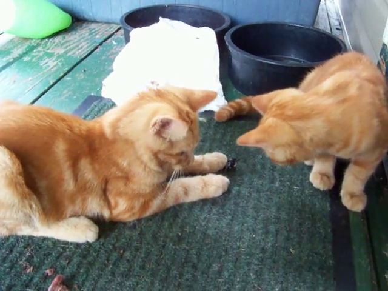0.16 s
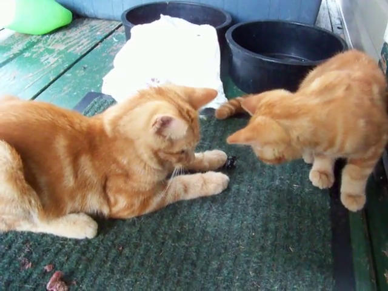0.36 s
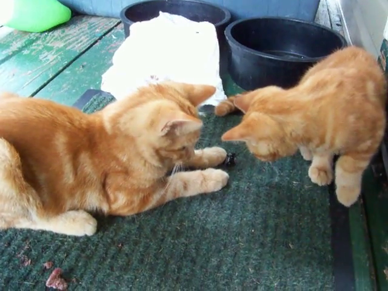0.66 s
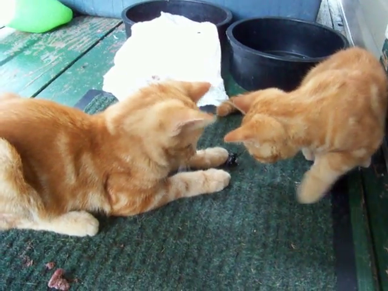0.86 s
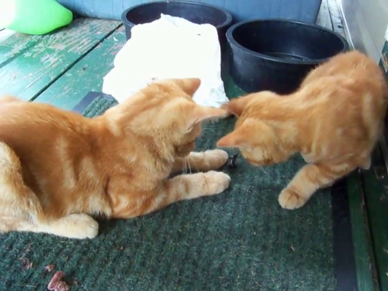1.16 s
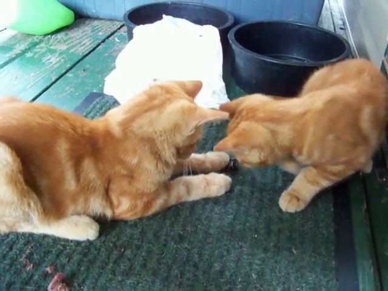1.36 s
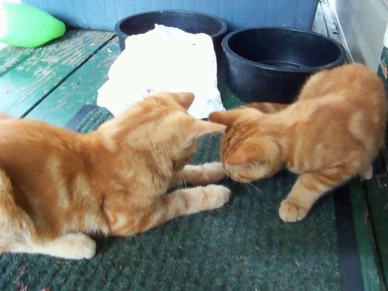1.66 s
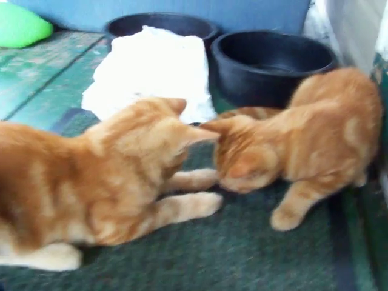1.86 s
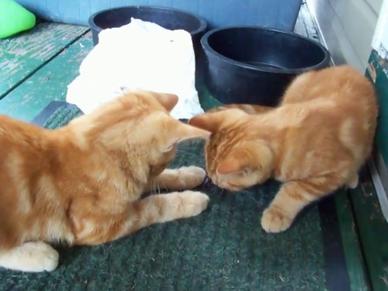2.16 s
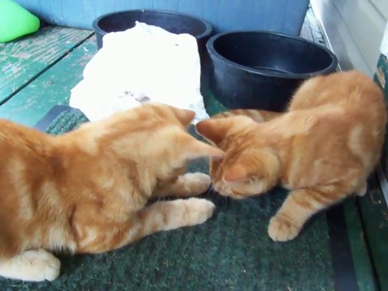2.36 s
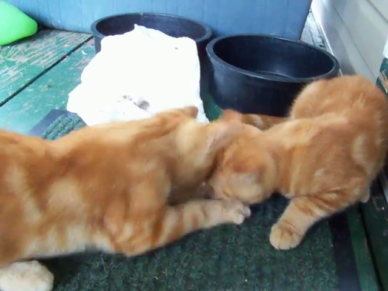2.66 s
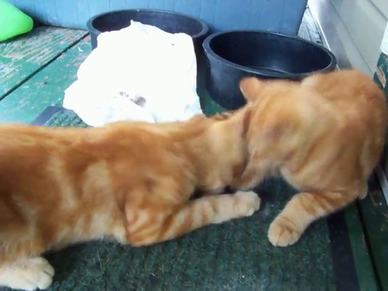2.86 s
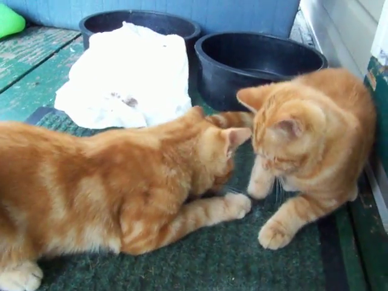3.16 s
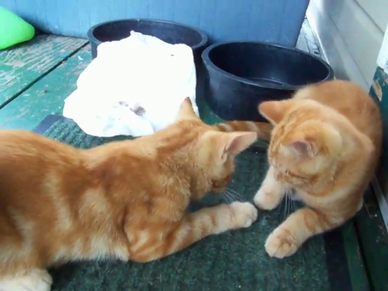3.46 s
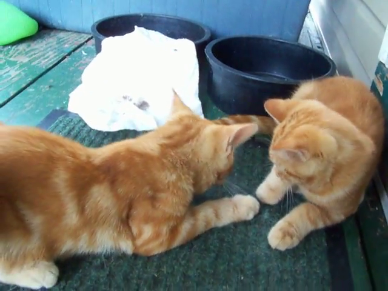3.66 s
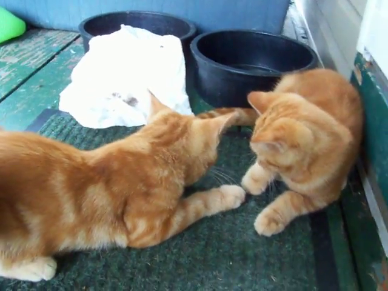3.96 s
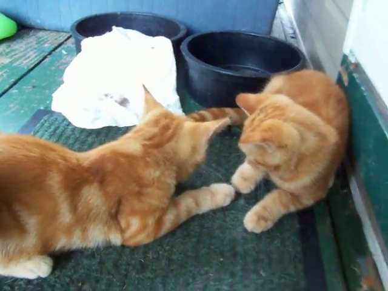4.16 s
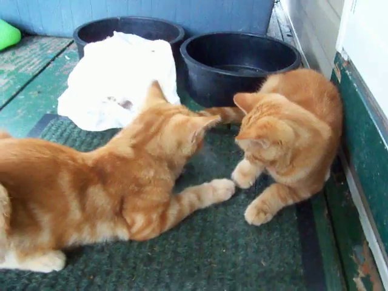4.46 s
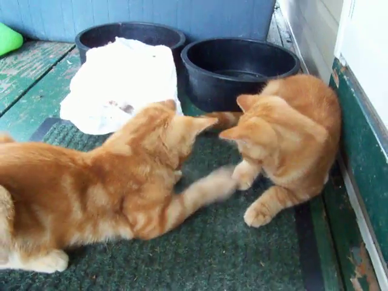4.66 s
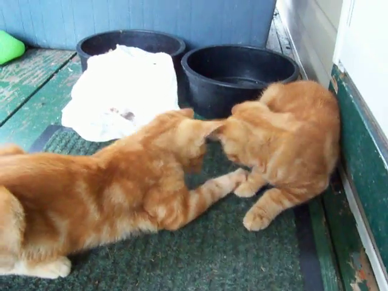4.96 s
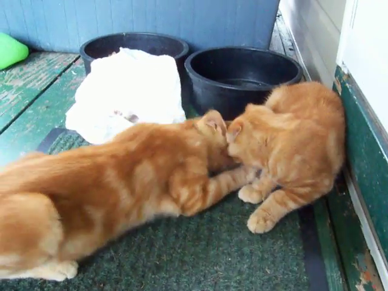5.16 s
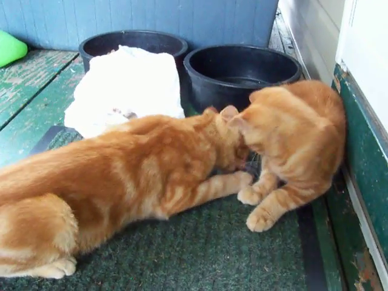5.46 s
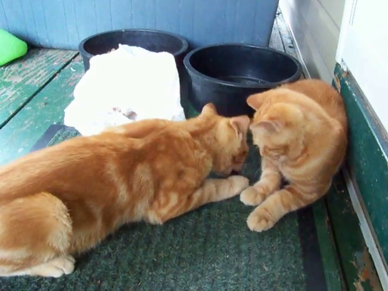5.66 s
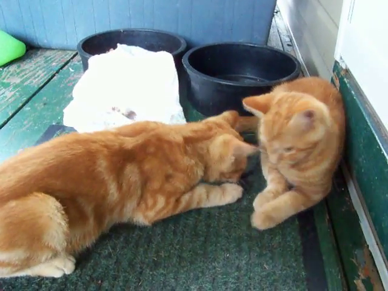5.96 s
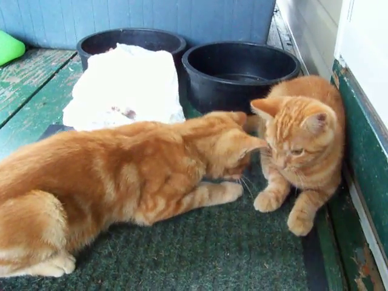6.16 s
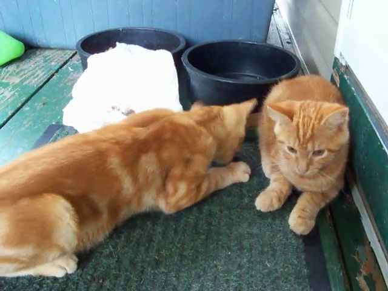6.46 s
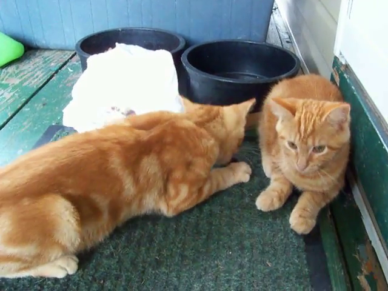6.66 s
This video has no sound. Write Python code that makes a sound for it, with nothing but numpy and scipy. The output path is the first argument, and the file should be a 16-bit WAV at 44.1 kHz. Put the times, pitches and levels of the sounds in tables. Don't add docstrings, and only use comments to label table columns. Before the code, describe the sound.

A cicada held on a carpeted porch buzzes loudly and harshly, very close, with almost no low body: a dry, shrill rasp of rapid clicks centred high, around five to seven kilohertz. From 0 to 1.4 seconds it sputters in uneven bursts with tiny gaps, a clearer pause near 0.4 and sparser ticks around 0.9 to 1.4. From 1.4 to 2.8 it struggles in longer, rougher bouts, overloading into sharp digital crackles; a soft paw lands near 2.7. At about 2.9 the buzz drops abruptly, thinner and muffled, then continues faster and more even, weakest around 4.1. At 4.4 it surges back bright and strong, sustaining to the end at 6.8 with a deep dip near 5.4, a short break at 5.6, wavering swells and faint wing rattles. Distant traffic's dull hum and roar fade beneath, with slight breeze rumble.

```python
import sys
import numpy as np
from scipy import signal
from scipy.fft import rfft, irfft
from scipy.io import wavfile

SR = 44100
rng = np.random.default_rng(int(sys.argv[2]) if len(sys.argv) > 2 else 0)


def waveform_to_disk(signal):
    frames = np.transpose(np.atleast_2d(signal))
    scaled = np.clip(frames, -1, 1) * 32767
    samples = np.round(scaled).astype(np.int16)
    wavfile.write(sys.argv[1], SR, samples)


def natural_amplitude(level_db):
    exponent = np.asarray(level_db, float) / 20
    return 10 ** exponent


N = 300321

# start in seconds, end in seconds, level over effort in dB,
# change over the last moment in dB.
BOUTS = [(0, .103, 3.5, -2), (0.112, 0.244, 4, 3.5), (.261, .36, 1.5, -3), (.463, .865, 0.5, -4),
         (0.903, .908, -3.5, -1.5), (0.947, 1.075, -0.5, -6), (1.125, 1.235, -2, -2), (1.249, 1.272, 0, -5),
         (1.284, 1.29, -2.5, -1.5), (1.407, 1.413, -2, -0.5), (1.431, 2.158, 1.5, -16),
         (2.173, 2.184, -30, 0), (2.205, 2.99, -1.5, -3.5), (3.009, 3.194, 1.5, 2), (3.203, 3.259, -1, 3),
         (3.272, 3.496, -1, -3), (3.513, 3.599, -0.5, -10.5), (3.615, 3.733, 1, -12),
         (3.74, 3.894, -1.5, -7), (3.913, 4.215, 0.5, 2), (4.231, 4.33, -1.5, 7), (4.35, 5.576, -0.5, 2),
         (5.623, 6.81, -0.5, -5)]
# time in seconds, level in dB.
EFFORT = [(0, -20.5), (.36, -20), (1.3, -20), (1.5, -22.5), (1.6, -18.5), (2.06, -16), (2.57, -15.5),
          (2.77, -15), (2.88, -24), (2.94, -41.5), (3.2, -34.5), (3.4, -21.5), (4.1, -30.5), (4.4, -13.5),
          (4.55, -19.5), (5.06, -16.5), (5.4, -27), (6.81, -20.5)]
# time in seconds, cycles per second.
SPEED = [(0, 76), (.36, 66), (.85, 68), (1.22, 62), (1.45, 66), (1.6, 82), (1.75, 83), (1.9, 70),
         (2.45, 72), (2.55, 85), (2.9, 93), (3.4, 91), (3.7, 87.7), (4.5, 87.5), (5.1, 89.5), (5.85, 80.5),
         (6.4, 87.3), (6.81, 79)]
# time in seconds, lag of the second tymbal in cycles,
# second tymbal in dB, later ribs in dB, unevenness in ms, gap between ribs in ms.
GAIT = [(0, .48, -1, -13, .5, 3), (.85, .48, -1, -14, .45, 2.9), (1.0, .46, -2, -13, .45, 3.2),
        (1.45, .47, -2, -9, .5, 3.3), (1.68, .45, -1, -10, .35, 3.1), (1.9, .48, -1, -12, .45, 3.3),
        (2.45, .48, -1, -12, .45, 3.3), (2.6, .45, -1, -15, .25, 2.6), (2.9, .46, -2, -14, .25, 2.6),
        (3.05, .41, -4, -11, .2, 2.2), (3.4, .41, -7, -18, .05, 2.4), (3.75, .41, -5, -16, .06, 2.4),
        (4.0, .4, -3, -13, .08, 2.4), (4.3, .36, -3, -12, .12, 2.5), (4.5, .31, -1, -9, .25, 3),
        (4.85, .37, -1, -8, .15, 3), (5.2, .39, -3, -11, .2, 2.3), (5.55, .38, -3, -12, .15, 2.3),
        (5.8, .37, -2, -10, .15, 2.3), (6.81, .37, -2.5, -8, .12, 2.4)]
BEATS = [2.6644, 2.8166, 2.8919, 2.9785, 3.0872, 3.1638, 3.1855, 3.2516, 3.3504, 3.4272, 3.4936, 3.5941,
         3.6966, 3.7195, 3.8223, 3.8904, 3.9944, 4.0737, 4.1533, 4.2104, 4.5093, 4.5883, 4.6669, 4.7455,
         4.823, 4.9024, 4.9819, 5.0602, 5.1388, 5.2164, 5.2967, 5.3768, 5.4554, 5.5352, 5.5696, 5.7145,
         5.8011, 5.8904, 5.9757, 6.0622, 6.144, 6.2254, 6.3074, 6.3875, 6.4678, 6.5489, 6.6329, 6.7222,
         6.7985]
STRUGGLE = [.5222, .5287, .5376, .551, .5566, .571, .5797, .5864, .5956, 1.4641, 1.4817, 1.4965, 1.51,
            1.5382, 2.2915, 2.2985, 2.323, 2.5851, 2.618]
JUMPS_UP_EARLY = [0.0008, 0.0569, 0.0685, 0.0741, 0.0854, 0.1133, 0.1524, 0.1528, 0.155, 0.1595, 0.1597,
                  0.1655, 0.179, 0.1874, 0.1876, 0.2081, 0.2395, 0.2786, 0.2836, 0.512, 0.6011, 0.6166,
                  0.6308, 0.631, 0.6455, 0.6892, 0.7018, 0.7312, 0.8086, 0.8149, 1.1305, 1.1816, 1.2163,
                  1.6127, 1.6515, 1.7618, 1.767, 1.774, 1.7744, 1.8037, 1.8355, 1.8361, 1.8788, 1.8793,
                  1.9045, 1.9117, 1.9345, 1.9488]
JUMPS_UP_LATE = [1.9541, 1.9832, 2.0059, 2.0063, 2.0124, 2.032, 2.0571, 2.0575, 2.0751, 2.0755, 2.0822,
                 2.0828, 2.0963, 2.0967, 2.1163, 2.1249, 2.1255, 2.1329, 2.1789, 2.1793, 2.219, 2.227,
                 2.2695, 2.2698, 2.2834, 2.2839, 2.33, 2.3306, 2.3568, 2.357, 2.3622, 2.3691, 2.3825,
                 2.3876, 2.3951, 2.3954, 2.4218, 2.4224, 2.437, 2.4373, 2.478, 2.4862, 2.4931, 2.4933,
                 2.5005, 2.527, 2.5388, 2.5628, 2.5738, 2.7038, 2.7356, 2.747, 2.7471, 2.7585, 2.769,
                 2.7751, 4.3261, 4.4284, 4.997]
JUMPS_DOWN_EARLY = [0.0122, 0.0378, 0.0628, 0.0796, 0.0928, 0.1333, 0.1461, 0.2225, 0.313, 0.3451, 0.4812,
                    0.5434, 0.5638, 0.6756, 0.7476, 0.7891, 0.8015, 0.8017, 0.828, 0.8282, 0.8588, 1.0363,
                    1.6001, 1.6248, 1.665, 1.7498, 1.7788, 1.786, 1.7866, 1.7976, 1.8112, 1.8287, 1.9197]
JUMPS_DOWN_LATE = [1.9624, 1.9683, 2.0203, 2.0442, 2.0448, 2.0625, 2.0698, 2.1022, 2.1105, 2.1415, 2.2415,
                   2.256, 2.2613, 2.3132, 2.3136, 2.3433, 2.3695, 2.3756, 2.3958, 2.4022, 2.4087, 2.4867,
                   2.5073, 2.7148, 2.7251, 2.7318, 2.7541, 2.7545, 2.758, 2.7646, 2.7748, 4.4056, 4.4169,
                   5.128]
# time in seconds, upper ring in Hz, lower ring in Hz.
TUNING = [(0, 6486, 4935), (1.5, 6487, 5110), (2.1, 6533, 4770), (2.6, 6563, 4680), (2.75, 6902, 4770),
          (3.3, 7034, 4630), (3.55, 6800, 4410), (4.2, 6970, 4320), (4.38, 6795, 4960), (4.95, 7040, 4800),
          (5.6, 6770, 4760), (6.3, 6950, 4830), (6.81, 6660, 4710)]
# time in seconds, upper ring length in ms,
# lower ring length in ms, bare snap over lower ring in dB.
FREEDOM = [(0, 0.15, .2, -17), (1.5, 0.16, 0.16, -18.5), (2.1, 0.15, 0.16, -16.5), (2.75, .16, 0.18, -23),
           (3.2, 0.18, 0.17, -27), (3.4, 0.25, 0.16, -21), (4.2, 0.22, 0.21, -31), (4.45, 0.2, 0.14, -27),
           (5.0, 0.18, 0.15, -19), (5.45, .16, 0.16, -24), (6.0, 0.17, 0.12, -28), (6.3, 0.14, .16, -20.5),
           (6.81, 0.14, 0.17, -34)]
# start in seconds, edge in Hz.
BODY_EDGES = [(0, 4250), (.9, 3900), (1.4, 4350), (2.779, 3650), (4.34, 3500), (5.44, 3600), (6.341, 3700)]
# start in seconds, middle ring over upper in dB, lower ring over upper in dB,
# near echo in dB, share cancelled by the carpet from 0 to 1.
POSTURES = [(0, -2.5, -5, -4, 0.4), (.4, -3, -4.5, -4.5, 0.04), (1.35, -6, -4.5, -4.5, 0.4),
            (1.6, -12.5, -7, -8, 0), (1.9, -8.5, -6.5, -9.5, 0.3), (2.2, -4.5, -4.5, -8, 0),
            (2.62, -5.5, -2.5, -11, 0.2), (2.788, -7, -6, -25.5, 0.5), (2.927, 4, 0, -14.5, 0.4),
            (3.0, 3, 1, -11.5, 0.7), (3.2, 6.5, 0.5, -4, 1), (3.27, -6, -8.5, -7.5, .9),
            (3.34, -12.5, -13.5, -16, 0.95), (3.8, -8, -8, -11, .9), (4.151, -12, -14, -14, .9),
            (4.34, -16, -11, -8.5, 0.2), (4.49, -12.5, -4.5, -4.5, 0), (4.771, -9, -4.5, -6, 0.4),
            (5.051, -7.5, -7, -3.5, 0.2), (5.24, -8.5, -4, -5, 0.2), (5.43, -6, -2.5, -7, .4),
            (5.6, -11, -2.5, -4, 0), (6.08, -8.5, -3, -6.5, 0.2), (6.339, -17.5, -1.5, -5, 0)]
# time in seconds,
# time to and from the extreme in seconds, change in dB.
SWEEPS = [(0.121, 0.018, -2.5), (1.988, 0.014, -5), (2.621, 0.069, -11.5), (2.83, 0.025, -5),
          (4.24, 0.023, -2), (4.77, 0.066, -6.5), (4.919, 0.079, -5.5), (5.28, 0.087, -2.5),
          (5.396, 0.026, -19), (5.539, 0.02, 0.5), (6.038, 0.074, 9), (6.14, 0.11, -3.5), (6.289, 0.066, 4),
          (6.345, .012, -7), (6.405, 0.028, -6.5), (6.6, 0.26, 1.5), (3.63, 0.022, 3.5), (3.76, 0.05, 6),
          (4.492, 0.015, -6.5), (2.8, 0.025, -9.5), (0.853, 0.017, -13.5), (2.92, 0.023, 5.5),
          (2.865, .02, 2.5), (5.09, .04, 1), (3.97, 0.028, -4.5), (6.43, 0.019, 4)]
# time in seconds,
# time to and from the loudest in seconds, level in dB.
RATTLES = [
    (4.51, .015, -52),
    (4.66, 0.061, -48.5),
    (4.83, 0.034, -47),
    (5.061, 0.058, -42.5),
    (5.41, 0.035, -48),
    (6.04, 0.073, -48),
    (6.29, 0.083, -48.5),
    (6.44, 0.027, -52),
]
# pitch in Hz, colour in dB per Hz.
AIR_COLOUR = [(12, -41.5), (20, -26), (48, -7), (187, -0.5), (227, 0), (293, -21), (356, -12), (481, -14.5),
              (823, -26.5), (957, -22.5), (1210, -22), (2030, -28.5), (2680, -23), (3050, -32), (3400, -37),
              (4420, -65), (7480, -120)]
# time in seconds, tyre roar in dB, drone over its steady level in dB.
VEHICLE = [(0, -43.5, 2), (.9, -40, 5), (1.6, -45, 1.5), (2.8, -50.5, 0), (3.6, -53.5, -1.5),
           (4.2, -67, -1), (5, -61, -3), (6, -63, -5.5), (6.81, -64, -6.5)]
# pitch in Hz, gain in dB.
INTAKE = [(7200, -1.5), (7500, -1), (7800, -11), (8000, -12)]
# pitch in Hz, gain in dB.
REBUILD = [(7000, 2), (7600, 1.5), (8000, -3.5), (8600, -16), (8900, -29.5), (9150, -44.5), (9400, -93)]
# pitch in Hz, width in Hz.
NOTCHES = [(300, 41), (975, 60)]

SWELL_S = 0.0007
HARD_PEAK = 0.71


def read(rows, at):
    first, *columns = np.transpose(rows)
    return [np.interp(at, first, column) for column in columns]


def latest(starts, s):
    return (np.searchsorted(starts, s, "right") - 1).clip(0)


def passing(rows, s):
    return sum(peak * (1 - np.abs(s - at) / half_s).clip(0) for at, half_s, peak in rows)


def rms_one(x):
    return x / np.sqrt(np.mean(x ** 2) + 1e-20)


def band(x, edges_hz):
    return signal.sosfilt(signal.butter(2, edges_hz, "band", fs=SR, output="sos"), x)


def jumps():
    up = [(s, 1) for s in JUMPS_UP_EARLY + JUMPS_UP_LATE]
    down = [(s, -1) for s in JUMPS_DOWN_EARLY + JUMPS_DOWN_LATE]
    return np.array(sorted(up + down))


def hard_times():
    s = jumps()[:, 0]
    return s[np.diff(s, prepend=-1) > 0.0012]


def buckles():
    rows = []
    on_beat = [(s - SWELL_S, True) for s in BEATS]
    either = [(s - SWELL_S, False) for s in np.r_[hard_times(), STRUGGLE]]
    marks = sorted(on_beat + either)
    for start, end, *_ in BOUTS:
        s, second = start + 0.001, 0
        luck = iter(rng.standard_normal((320, 4)).clip(-2, 2))
        while s < end:
            per_s, lag, second_db, ribs_db, uneven_ms, rib_ms = read(SPEED, s) + read(GAIT, s)
            z = next(luck)
            when = np.array([0, rib_ms / 1000]) + z[:2] * uneven_ms / 1000 * [0.7, 0.6]
            size = natural_amplitude([0, ribs_db + 4.5, second_db, second_db + ribs_db + 1.5])
            size = size * np.sqrt(SR / per_s / np.sum(size ** 2))
            opening_db = 0.5 * (s < start + 0.004) * np.array([1, 0])
            size = size[2 * second:][:2] * natural_amplitude(z[2:] * [1.1, 2.2] + opening_db)
            rows += [(s + w, a, uneven_ms) for w, a in zip(when, size) if s + w < end + 0.003]

            steps = np.roll([lag, 1 - lag], -second) / per_s
            ahead = [mark for mark in marks if s + steps[0] / 2 < mark[0] < end]
            if ahead:
                mark, first_only = ahead[0]
                reach = np.cumsum(np.tile(steps, 60))
                wrong_tymbal = (np.arange(120) + second) % 2 == 0
                miss = np.abs(np.log((mark - s) / reach)) + first_only * 9 * wrong_tymbal
                steps = steps * (mark - s) / reach[miss.argmin()]
            s, second = s + steps[0], 1 - second
    return np.array(rows)


def voice(s):
    start, end, bout_db, fade_db = np.transpose(BOUTS)
    k = latest(start, s)
    fading = (1 - (end[k] - s) / 0.02).clip(0, 1)
    shade_db = passing(SWEEPS, s)
    since, middle_db, lower_db, *_ = np.transpose(POSTURES)
    p = latest(since, s)
    level_db = read(EFFORT, s)[0] + bout_db[k] + fade_db[k] * fading + shade_db
    return level_db, middle_db[p] - 0.89 * shade_db, lower_db[p] - 0.4 * shade_db


def ring(s, level, hz, ms, wander):
    t = np.arange(300) / SR
    shape = (t / ms * 1000) ** 4 * np.exp(-t / ms * 1000)
    shape = shape / np.sqrt(np.sum(shape ** 2, axis=-1, keepdims=True) / 2)
    z = rng.standard_normal((len(s), 3)).clip(-2, 2) * wander[:, None]
    pitch = hz * (1 + 0.02 * z[:, 0])
    wave = np.sin(2 * np.pi * pitch[:, None] * t + 0.86 * z[:, 1:2]) * shape
    size = level * natural_amplitude(0.3 * z[:, 2])
    out = np.zeros(N + 600)
    np.add.at(out, (s * SR).astype(int)[:, None] + np.arange(300), wave * size[:, None])
    return out[:N]


def body_edge(x):
    t, out = np.arange(N) / SR, 0
    for (a, edge_hz), (b, _) in zip(BODY_EDGES, BODY_EDGES[1:] + [(np.inf, 0)]):
        high = signal.butter(3, edge_hz, "high", fs=SR, output="sos")
        out = out + signal.sosfilt(high, x * (t >= a) * (t < b) + 1e-18)
    return out


def wing_rattle(s, size, wander):
    pressed = passing([(at, half_s, natural_amplitude(db)) for at, half_s, db in RATTLES], s)
    pressed = pressed * size * natural_amplitude(6 * rng.standard_normal(len(s)))
    return ring(s, pressed, 1700, 0.023, wander)


def cicada():
    s, size, uneven = buckles().T
    hard = hard_times() - SWELL_S
    keep = np.abs(s[:, None] - hard).min(axis=1) > 0.002
    s, size = np.r_[s[keep], hard].clip(0), size[keep]
    wander = 0.5 + np.r_[uneven[keep], hard * 0 + 0.5]
    level_db, middle_db, lower_db = voice(s)
    upper_hz, lower_hz = read(TUNING, s)
    upper_ms, lower_ms, snap_db = read(FREEDOM, s)
    level = natural_amplitude(level_db)
    level[:len(size)] *= size
    level[len(size):] = HARD_PEAK * 4

    upper = ring(s, level, upper_hz, upper_ms[:, None], wander)
    middle = ring(s, level * natural_amplitude(middle_db), 5645, 0.19, wander)
    lower = ring(s, level * natural_amplitude(lower_db), lower_hz, lower_ms[:, None], wander)
    snap = ring(s, level * natural_amplitude(lower_db + snap_db), 3610, 0.1, wander)
    rattle = wing_rattle(s, np.r_[size, hard * 0], wander)
    return upper + middle + body_edge(lower) + snap + rattle


def carpet_dip(insect):
    dip_hz, width_hz = 5330, 300
    lost = insect - signal.lfilter(*signal.iirnotch(dip_hz, dip_hz / width_hz, SR), insect)
    since, *_, cancelled = np.transpose(POSTURES)
    return insect - lost * cancelled.clip(0, 1)[latest(since, np.arange(N) / SR)]


def echoes(x, t60_s, first_s):
    t = np.arange(SR // 2) / SR
    sparse = rng.random(len(t)) < 0.04 + 6 * t
    tail = rng.standard_normal(len(t)) * sparse * natural_amplitude(-60 * t / t60_s) * (t > first_s)
    return signal.fftconvolve(x, tail / np.sqrt(np.sum(tail ** 2)))[:N]


def near_echoes(insect):
    t, close = np.arange(N) / SR, 0
    for (a, *_, near_db, _), (b, *_) in zip(POSTURES, POSTURES[1:] + [(np.inf,)]):
        part, near = insect * (t >= a) * (t < b), natural_amplitude(near_db)
        close = close + (part + near * echoes(part, 0.023, first_s=0.001)) / np.sqrt(1 + near ** 2)
    return close


def paw():
    t = np.arange(N) / SR - 2.675
    puff = rng.standard_normal(N) * np.exp(-t.clip(0) / 0.01) * (t > 0) + 1e-18
    return natural_amplitude(-15) * band(puff, (300, 840))


def traffic():
    hz = np.fft.rfftfreq(N, 1 / SR).clip(1)
    points = np.array(AIR_COLOUR)
    colour = natural_amplitude(np.interp(np.log(hz), np.log(points[:, 0]), points[:, 1])) + natural_amplitude(-29.5)
    air = rms_one(irfft(rfft(rng.standard_normal(N)) * colour, N))
    roar = rms_one(band(rng.standard_normal(N), [640, 980]))
    hum_hz, width_hz = 179, 34
    hum = rms_one(signal.lfilter(*signal.iirpeak(hum_hz, hum_hz / width_hz, SR), rng.standard_normal(N)))
    roar_db, drone_db = read(VEHICLE, np.arange(N) / SR)
    return natural_amplitude(drone_db) * (natural_amplitude(-40) * air + natural_amplitude(-47) * hum) + natural_amplitude(roar_db) * roar


def breeze():
    return natural_amplitude(-49) * rms_one(band(rng.standard_normal(N), [22, 55]))


def scene():
    insect = carpet_dip(cicada())
    porch = natural_amplitude(-15) * echoes(insect, 0.18, first_s=0.006)
    return (near_echoes(insect) + porch + paw() + traffic() + breeze())[None]


def overflow(low, rate):
    for s, side in jumps():
        near = round(s * rate) + np.array([0, -1, 1])
        at = near[np.argmin(side * low[near])]
        low[at] = np.clip(low[at] + side * 1.3, -HARD_PEAK, HARD_PEAK)
    return low


def output_stage(x):
    knee, ceiling = 0.67, 1
    over, room = (np.abs(x) - knee).clip(0), ceiling - knee
    return x - np.sign(x) * (over - room * np.tanh(over / room))


def band_limit(x):
    return signal.sosfilt(signal.butter(12, 15900, fs=SR, output="sos"), x)


def record(dry):
    low_rate, headroom = 16000, 0.7
    long = -(-N // 441) * 441
    short = long * low_rate // SR
    hz = np.fft.rfftfreq(long, 1 / SR)
    bent = dry[0] + 0.036 * dry[0] ** 2
    taken = (rfft(bent, long) * natural_amplitude(read(INTAKE, hz)[0]))[:short // 2 + 1]
    low = irfft(taken, short) * short / long
    low = headroom * np.tanh(low / headroom)
    low = overflow(low, low_rate)
    for notch_hz, width_hz in NOTCHES:
        low = signal.lfilter(*signal.iirnotch(notch_hz, notch_hz / width_hz, low_rate), low)
    half = rfft(low)
    mirrored = np.r_[half, np.conj(half[-2::-1])]
    rebuilt = mirrored * natural_amplitude(read(REBUILD, hz[:len(mirrored)])[0])
    full = irfft(rebuilt, long)[:N] * long / short
    return band_limit(output_stage(full)[None])


dry = scene()
out = record(dry)
waveform_to_disk(out)
```